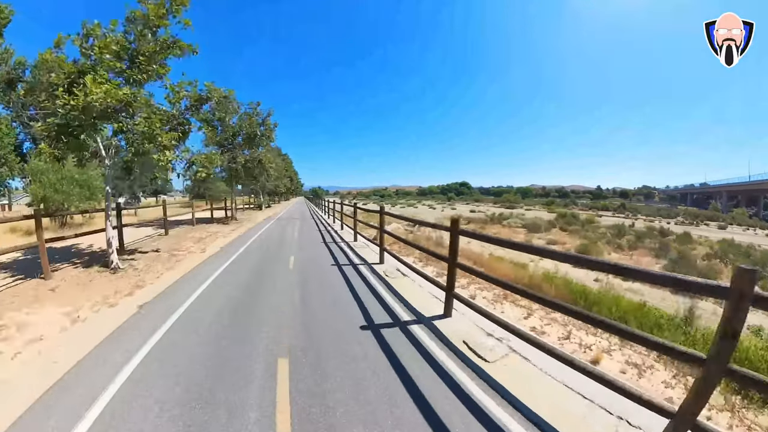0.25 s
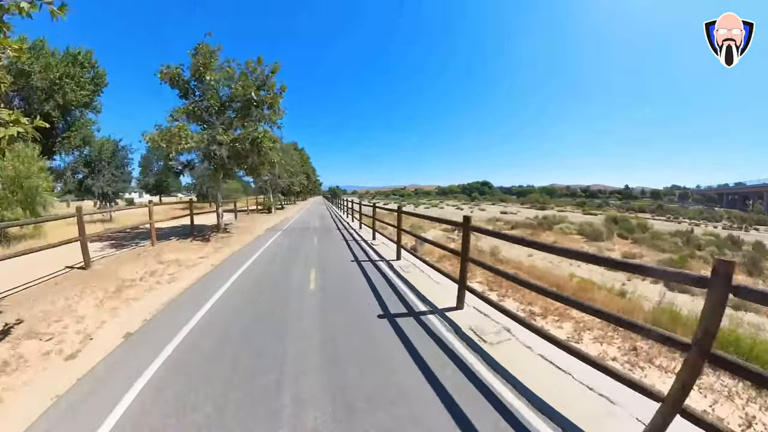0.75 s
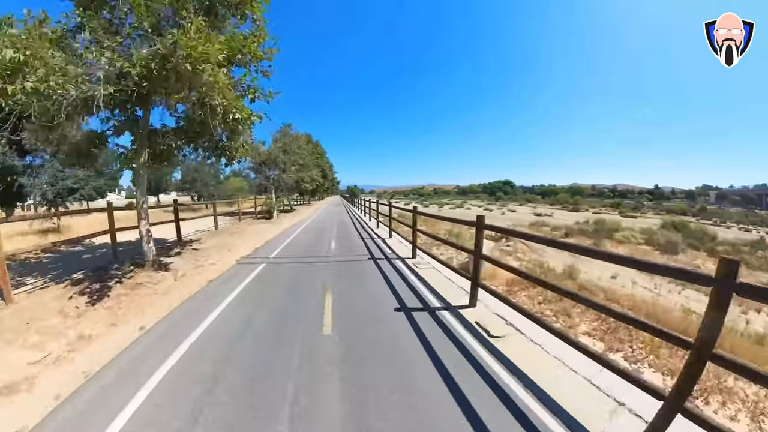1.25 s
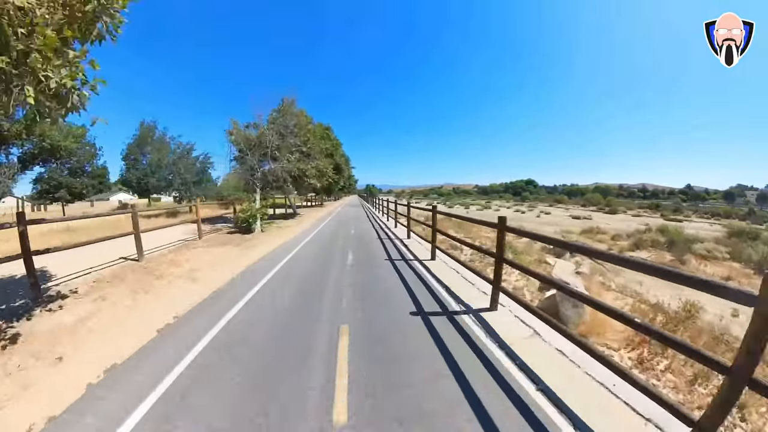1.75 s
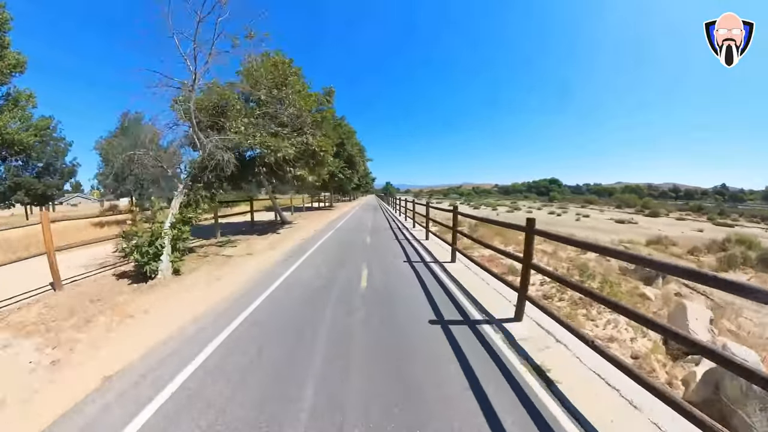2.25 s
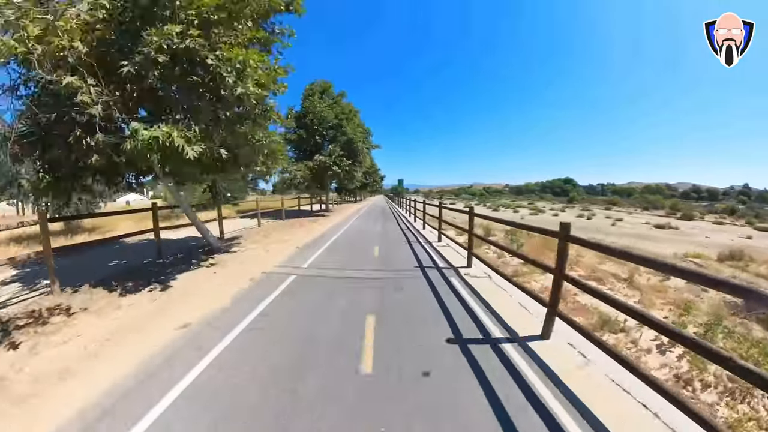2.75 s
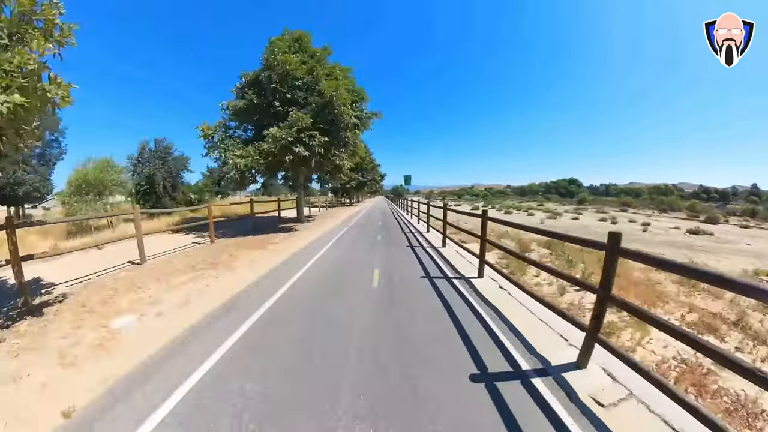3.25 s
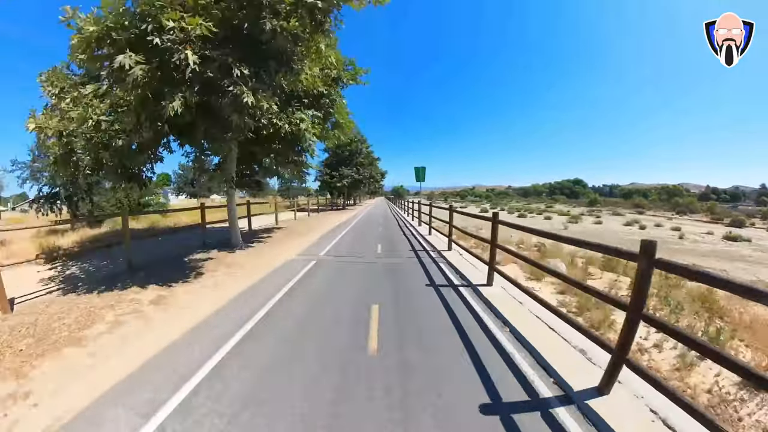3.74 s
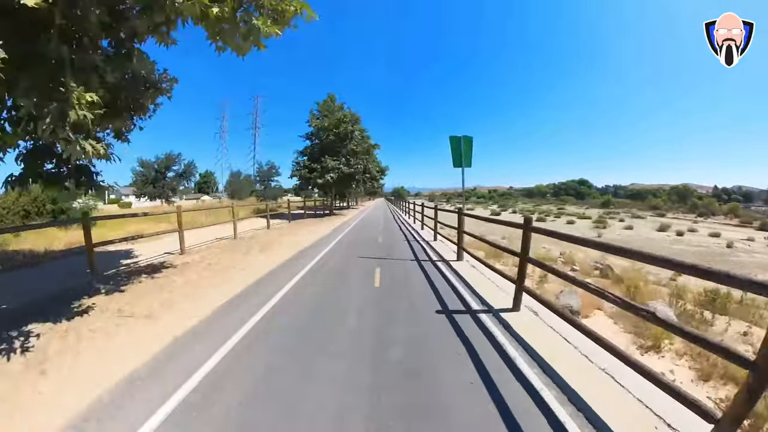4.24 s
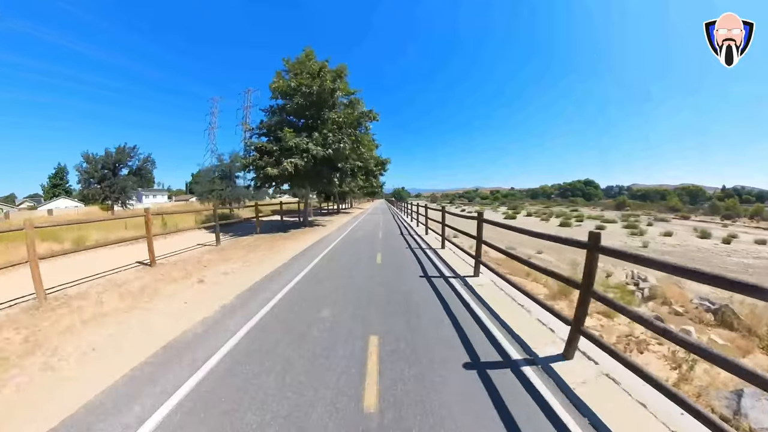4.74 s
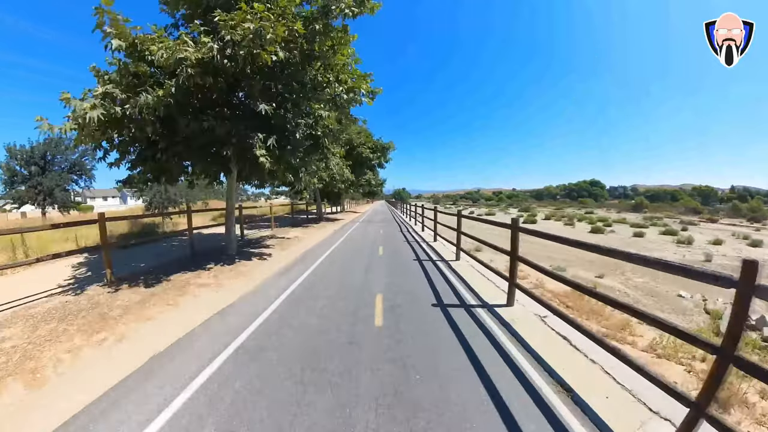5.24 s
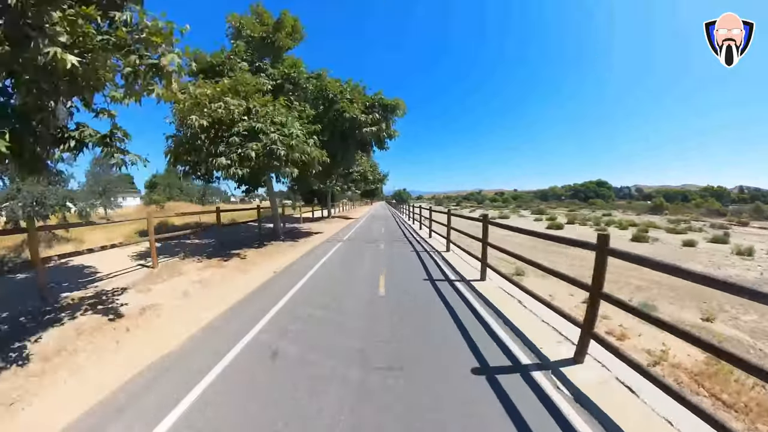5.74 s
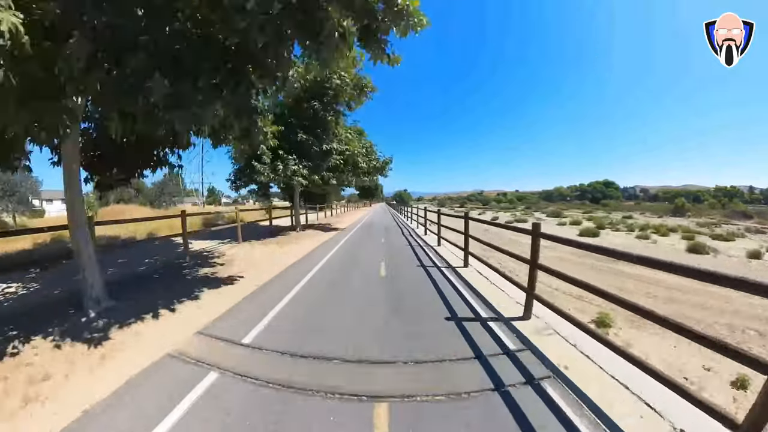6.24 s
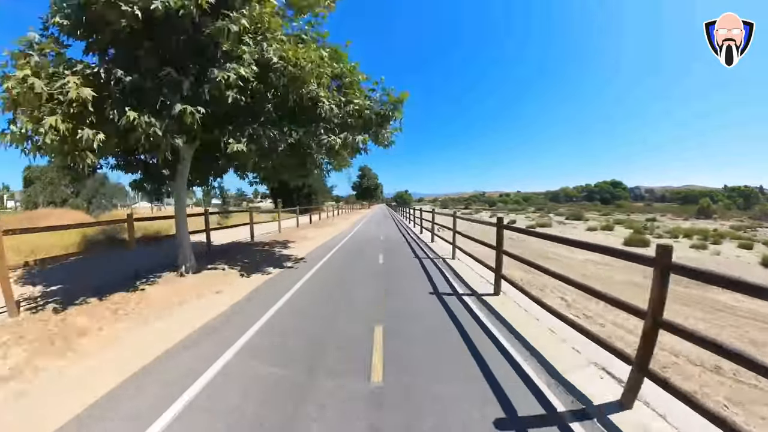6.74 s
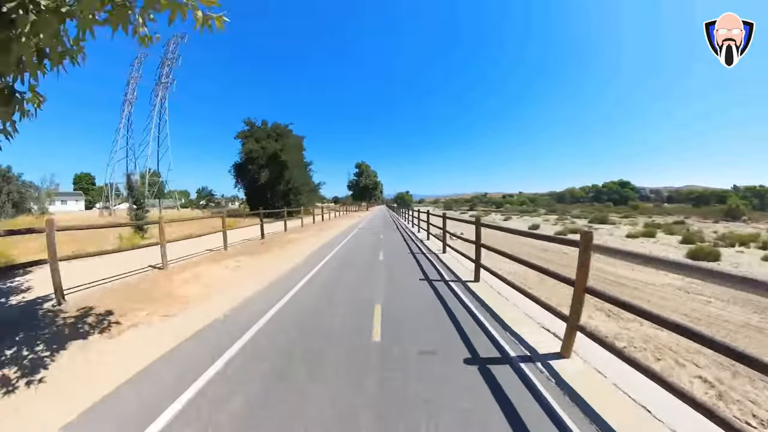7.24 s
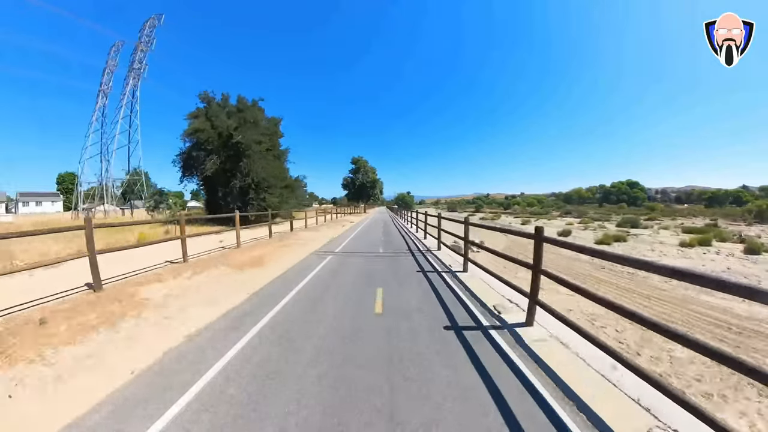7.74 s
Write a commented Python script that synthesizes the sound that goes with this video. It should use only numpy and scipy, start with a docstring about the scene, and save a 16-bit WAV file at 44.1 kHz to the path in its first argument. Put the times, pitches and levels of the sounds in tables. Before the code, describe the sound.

Heard from a rider-mounted microphone in open air, an electric scooter gradually accelerates. A low motor hum with overtones climbs smoothly while bassy wind buffets and drones around the microphone. Tyres hiss faintly and a brake disc brushes lightly once per turn. Dull stem knocks come irregularly; paving joints bring thumps with small metallic clinks at about two, four and a half, and six and a half seconds, the last hardest.

```python
"""An electric scooter accelerates along a paved path, heard from a camera on the rider.
Two hub motors hum and whine upwards as multiples of wheel speed, while noise-made wind buffets the microphone.
Tyres hiss, a brake disc brushes its pad once a turn, the stem knocks, wheels thump into joints in the paving,
loose steel clinks over them and grit spits from a tyre: rings of decaying modes and short bursts of noise.
Now and then a big eddy hits the microphone and the camera's limiter ducks everything for a moment."""
import sys
import numpy as np
from scipy import signal
from scipy.fft import rfft, irfft, next_fast_len
from scipy.io import wavfile
from scipy.ndimage import uniform_filter1d, minimum_filter1d, map_coordinates

SR = 44100
rng = np.random.default_rng(int(sys.argv[2]) if len(sys.argv) > 2 else 0)


def bounce(signal):
    """Save signal as a 16-bit WAV file at the path given by the first command-line argument."""
    frames = np.transpose(np.atleast_2d(signal))
    limited = np.clip(frames, -1, 1)
    pcm = np.round(limited * 32767).astype(np.int16)
    wavfile.write(sys.argv[1], SR, pcm)


N = 352359
T = np.arange(N) / SR  # time of each sample, s


def amp(db):
    """Decibels to gain."""
    return 10 ** (np.asarray(db) / 20)


def unit(x):
    """Scale to rms 1."""
    return x / np.sqrt(np.mean(x ** 2) + 1e-20)


def curve(rows):
    """One value per sample, on straight lines between rows of (time in s, value)."""
    seconds, values = np.transpose(rows)
    return np.interp(T, seconds, values)


def wobble(rate):
    """A smooth random curve, rate knots a second."""
    knots = rng.standard_normal(int(N * rate / SR) + 4)
    return map_coordinates(knots, [T * rate])


def swell(middle, length):
    """A smooth rise from 0 to 1 and back, centred on a time; both in seconds."""
    return np.cos(np.pi * np.clip((T - middle) / length, -.5, .5)) ** 2


def filtered(x, response):
    """Shape the spectrum of x by a response of frequency."""
    size = next_fast_len(N + SR // 4)
    hz = np.fft.rfftfreq(size, 1 / SR)
    return irfft(rfft(x, size) * response(hz), size)[:N]


def noise(spectrum, flutter_db, flutter_rate):
    """Turbulent noise of rms 1: it comes in quick random bursts, then takes its colour."""
    hz, db = np.transpose(spectrum)
    bursts = rng.standard_normal(N) * amp(flutter_db * wobble(flutter_rate))
    colour = lambda f: amp(np.interp(np.log(f + 1), np.log(hz), db, right=-120))
    return unit(filtered(bursts, colour))


def add(track, start, sound):
    """Mix a sound into the track at a time in seconds."""
    part = track[max(0, round(start * SR)):][:len(sound)]
    part += sound[:len(part)]


# The first wheel, gathering pace under the rider. Each row: time in seconds, speed in turns a second.
WHEEL_SPEED = [(0, 13.93), (1.1, 14.2), (1.8, 15.05), (2.3, 15.4), (4, 17.35), (4.3, 17.5), (5.3, 18.5),
               (8, 20.45)]


def wheel_speed():
    """Turns a second of the first wheel, which sets the motors' pitch and the rolling level."""
    return curve(WHEEL_SPEED)


SLIP = .986  # the second wheel's speed over the first's


def wheel_turns():
    """Turns made by each wheel; the second rolls a little slower."""
    turns = np.cumsum(wheel_speed()) / SR
    return turns, turns * SLIP


def by_speed(cruise_db, per_doubling_db):
    """Level in dB of a noise that grows with wheel speed, from its level at a middling speed."""
    cruise = 17  # turns a second
    return cruise_db + per_doubling_db * np.log2(wheel_speed() / cruise)


# Resonances that a motor line swells in as it climbs through them.
# Each row: centre in Hz, width in Hz, line level in dB.
BODY_RESONANCES = [(139.3, 6, -11.8), (151.3, 15, -16.5), (161.1, 7.4, -18.5), (174, 3.4, -21.5),
                   (182.66, 7, -15.5), (200.3, 6.8, -15), (306.6, 6.8, -25.5), (324.3, 12, -24),
                   (340, 8.5, -21), (363.5, 10, -22.3), (378.6, 11, -24.3), (404, 14, -29), (810, 46, -46),
                   (873, 57, -42), (955, 31, -43.5)]


def body_db(order):
    """Level in dB of a motor line as its pitch climbs through the resonances."""
    hz = order * wheel_speed()
    power = 0
    for centre, width, db in BODY_RESONANCES:
        detuning = 2 * (hz - centre) / width
        power = power + amp(db) ** 2 / (1 + detuning ** 2) ** 1.325
    return 10 * np.log10(power)


def tone(turns, order, db, waver_db, jitter, shake_rate=15):
    """A motor line at a multiple of the wheel speed, its phase (jitter in radians) shaken by the road."""
    phase = 2 * np.pi * order * turns + jitter * wobble(shake_rate)
    return np.sqrt(2) * amp(db + waver_db * wobble(16)) * np.sin(phase)


# The second motor's slot tone, which sinks away early. Each row: time in seconds, level in dB.
SLOT_TONE = [(0, -31.5), (0.85, -27.5), (1.27, -21.5), (1.5, -55)]


def motors(first, second):
    """Torque ripple hums ten times a turn, with harmonics; the other motor adds its slot tone and whine."""
    hum = tone(first, order=10, db=body_db(10), waver_db=1.2, jitter=.11)
    hum += tone(first, order=20, db=body_db(20), waver_db=1.4, jitter=.15)
    hum += tone(first, order=30, db=body_db(20) - 19.5, waver_db=3.0, jitter=1.0)
    slots = tone(second, order=27, db=curve(SLOT_TONE), waver_db=1.0, jitter=0.45)
    whine = tone(second, order=56, db=body_db(56 * SLIP), waver_db=2.2, jitter=.55, shake_rate=20)
    return hum + slots + whine


# Turbulence right at the microphone, before the big eddies. Each row: time in seconds, level in dB.
GUSTS = [(0, -17.5), (0.4, -19.5), (0.9, -19), (1.15, -15.5), (2.6, -15), (3.7, -16), (4.2, -15),
         (4.9, -17), (5.6, -15), (6.3, -14.5), (8, -16)]
# Air rushing round the camera. Each row: time in seconds, level in dB.
RUSH = [(0, -36), (0.2, -38), (0.4, -39.5), (0.65, -38), (0.95, -37.5), (1.3, -33), (1.6, -37), (1.85, -30),
        (2.15, -37), (2.42, -33.5), (2.7, -33.5), (3.08, -34.5), (3.3, -33), (3.52, -32.5), (3.7, -31.5),
        (3.88, -34.5), (4.3, -31.5), (4.6, -36), (4.92, -30), (5.1, -33.5), (5.5, -33), (5.88, -34),
        (6.33, -32.5), (6.5, -33), (7.2, -33.5), (8, -33)]
# Big eddies striking the microphone. Each row: middle in seconds, length in seconds, extra buffet in dB,
# extra drone in dB, slow pressure push in dB.
EDDIES = [(1.965, 0.35, 7.5, 7, -9.5), (2.096, 0.27, 4, 4.5, -8.5), (2.437, 0.27, 0, 3, -22),
          (3.412, 0.25, 8, 3.5, -9), (4.405, 0.27, 5.5, 3, -24), (4.51, 0.22, 7.5, 4.5, -6.5),
          (6.6, 0.21, 7, 4.5, -10), (7.26, 0.061, 2, -5, -25.5)]
# Colours of the wind at the microphone and round the camera. Each row: frequency in Hz, relative level in dB.
BUFFET_SPECTRUM = [(10, -56), (22, -31), (30, -11.5), (40, -1), (55, 4), (75, 0.3), (100, -1), (125, -2.5),
                   (170, -10), (400, -63)]
DRONE_SPECTRUM = [(70, -28.5), (115, -19), (140, 5), (165, -7), (203, -4), (230, -14), (290, -15.5),
                  (400, -17.5), (500, -25), (700, -38.5), (1500, -74.5)]
RUSH_SPECTRUM = [(300, -16.5), (550, 2), (680, 2), (820, 2.5), (1180, 4), (1280, -2), (1420, -11),
                 (2100, -15.5), (2700, -23), (3500, -34), (6000, -68)]


def wind():
    """Turbulence buffets the microphone and surges in big eddies; smaller whirls drone and rush round it."""
    buffet_db = curve(GUSTS)
    drone_db = by_speed(cruise_db=-16.7, per_doubling_db=2)
    push = np.zeros(N)
    for middle, length, more_buffet_db, more_drone_db, push_db in EDDIES:
        eddy = swell(middle, length)
        push += amp(push_db) * eddy
        buffet_db = buffet_db + more_buffet_db * eddy
        drone_db = drone_db + more_drone_db * eddy
    buffet = amp(buffet_db) * noise(BUFFET_SPECTRUM, flutter_db=1.4, flutter_rate=9)
    drone = amp(drone_db) * noise(DRONE_SPECTRUM, flutter_db=2.6, flutter_rate=60)
    rush = amp(curve(RUSH)) * noise(RUSH_SPECTRUM, flutter_db=1.0, flutter_rate=170)
    return push + buffet + drone + rush


# Stretches of coarser asphalt under the wheels. Each row: middle in seconds, length in seconds, extra hiss in dB.
COARSE_ASPHALT = [(1.35, 1.2, 3.7), (2.9, 0.92, 2.5), (3.703, 0.84, 5), (4.202, 0.64, 3), (4.94, 0.59, 2),
                  (5.553, 0.9, 1.5), (6.164, 0.99, 4.5), (6.286, 0.17, 4), (7.88, 0.21, 2)]
# Ripples in the paving that shake the deck. Each row: middle in seconds, length in seconds, extra level in dB.
RIPPLES = [(1.852, 0.27, 0.5), (4.376, 0.5, 2), (4.927, 0.11, 2.5), (5.281, 0.14, 6.5), (6.15, 0.15, 8.5),
           (7.543, 0.3, 3.5)]
# Colours of the deck underfoot and of the tyres. Each row: frequency in Hz, relative level in dB.
DECK_SPECTRUM = [(220, -42), (300, -11), (340, -2.5), (378, 1.5), (420, -17.5), (520, -26), (900, -62)]
TYRE_SPECTRUM = [(1200, -14.5), (2400, 6), (3300, 0), (3950, 2), (4700, -6), (7000, -9.5), (7800, -17.5),
                 (9500, -11.5), (10500, -13), (11200, -30), (12000, -34)]


def rolling(turns):
    """Asphalt shakes the deck and hisses under the tyres; an uneven tread throbs once a turn."""
    coarse_db = sum(db * swell(middle, length) for middle, length, db in COARSE_ASPHALT)
    ripple_db = sum(db * swell(middle, length) for middle, length, db in RIPPLES)
    tread = np.cos(2 * np.pi * turns)
    deck_db = by_speed(cruise_db=-28, per_doubling_db=15) + ripple_db + 2 * tread
    deck_db += 0.56 * coarse_db  # coarse asphalt shakes the deck less than it lifts the hiss
    hiss_db = by_speed(cruise_db=-57, per_doubling_db=11.5) + coarse_db + 0.4 * tread
    hiss_db += 1.2 * wobble(13)
    deck = amp(deck_db) * noise(DECK_SPECTRUM, flutter_db=0.9, flutter_rate=40)
    hiss = amp(hiss_db) * noise(TYRE_SPECTRUM, flutter_db=1.5, flutter_rate=140)
    return deck + hiss


# How hard the brake disc brushes, down at the wheel. Each row: time in seconds, level in dB.
DISC_RUB = [(0, -68.5), (0.12, -63), (0.45, -73), (0.67, -64), (0.85, -70), (1.25, -62.5), (1.55, -62),
            (1.85, -74), (2.25, -77.5), (2.87, -69.5), (3.25, -77), (3.55, -64.5), (3.75, -71.5),
            (3.95, -62.5), (4.2, -80), (4.9, -72), (5.6, -79), (6.15, -61.5), (6.7, -73), (8, -75)]
# Modes of the brake disc. Each row: frequency in Hz, relative level in dB, 60 dB decay in seconds.
DISC_MODES = [(5700, -5, 0.09), (6900, -2.5, 0.13), (7100, -1, 0.13), (7660, -11.5, 0.02), (8600, -2, 0.05),
              (9160, 4.5, 0.16), (9410, 3, 0.16), (10500, -8.5, 0.015), (11500, -8.5, 0.029)]


def brake_disc(turns):
    """A slightly warped disc scrapes past its pad once a turn, never twice alike; friction makes it ring."""
    touch_turn, touch_rise = .1, .08  # where the touch starts and how long it swells, turns
    since = (turns - touch_turn + 0.02 * wobble(15)) % 1 / touch_rise
    touch = since * np.exp(1 - since) * amp(1.3 * wobble(15))
    drag = amp(by_speed(cruise_db=-13, per_doubling_db=26))  # between touches, relative to a touch
    friction = (touch + drag) * rng.standard_normal(N)

    def steel(f):
        """Summed resonances of the disc; a longer decay makes a narrower peak."""
        response = 0
        for hz, db, t60 in DISC_MODES:
            width = np.log(1000) / (np.pi * t60)
            response = response + amp(db) * 1j * f * width / (hz ** 2 - f ** 2 + 1j * f * width)
        return response

    return amp(curve(DISC_RUB)) * unit(filtered(friction, steel))


# What the stem and the camera mount ring with.
# Each row: frequency in Hz at the usual pitch, relative level in dB, 60 dB decay in seconds.
STEM_MODES = [(140, 1, .04), (270, -2, .03), (440, -3, .016), (820, -8, .008), (1080, -1.3, .012),
              (1450, -10.5, .010), (1900, -15, .007)]


def knock(pitch=1, top_hz=1900):
    """A dull blow: a click of a few cycles over a short low thump, softened by the camera mount."""
    t = T[:SR // 16]
    body = np.zeros(len(t))
    for hz, db, t60 in STEM_MODES:
        decay = amp(db + rng.normal() - 60 * t / t60)
        mode_hz = hz * pitch * np.exp(.04 * rng.normal())
        body += decay * np.sin(2 * np.pi * mode_hz * t)
    mount = signal.butter(4, top_hz, fs=SR, output="sos")
    return signal.sosfilt(mount, body)


# Play in the steering stem knocking through to the camera.
# Each row: start in seconds, strength in dB, pitch over the usual, treble reach in Hz.
STEM_KNOCKS = [(0.5065, -18, 1.05, 1800), (0.678, -19, .8, 1400), (0.8205, -21.5, .9, 1600),
               (1.0822, -15.5, 1, 1700), (1.3667, -13, 1, 2100), (2.044, -18, .65, 1000),
               (2.4367, -13, .95, 2200), (3.0074, -18, 1.05, 2000), (3.207, -22.5, 1, 1500),
               (3.2811, -19, 1.15, 2000), (3.4458, -16.5, 1.1, 1800), (4.0198, -17.5, .85, 1500),
               (4.351, -19, .8, 1400), (4.3921, -18, .95, 2000), (4.4817, -12, 1, 2100),
               (4.4848, -14, .85, 1400), (4.5186, -16, .85, 1600), (4.5567, -14, 1, 1800),
               (4.850, -18, .95, 1600), (4.8963, -19, .95, 1600), (5.0617, -15, 1, 1800),
               (5.903, -19, .8, 1400), (6.134, -17, .8, 1400), (6.338, -18, 1, 1600),
               (6.5857, -15.5, 1.25, 2400), (6.5997, -15.5, 1, 1700), (6.6322, -13, 1.05, 2300),
               (6.6682, -10, .8, 4000), (6.891, -15.5, 1, 1600)]


def knocks():
    """The stem's play knocks hard over bumps and chatters faintly at random times."""
    out = np.zeros(N)
    for start, db, pitch, top_hz in STEM_KNOCKS:
        add(out, start, amp(db) * knock(pitch, top_hz))
    for when, size in rng.random((60, 2)):
        add(out, when * N / SR, amp(-33.5 + 1.9 * size) * knock())
    return out


def ring(modes, scatter_db, blur):
    """One blow on a steel part: every mode starts at a new strength, and friction blurs its phase."""
    t = T[:SR // 4]
    hz, db, t60 = np.transpose(modes)[:, :, None]
    steps = rng.standard_normal((len(modes), len(t)))
    drift = np.cumsum(steps, axis=1) * blur / np.sqrt(SR)
    phase = 2 * np.pi * (hz * t + rng.random(hz.shape)) + drift
    decay = amp(db + scatter_db * rng.standard_normal(hz.shape) - 60 * t / t60)
    return np.sum(decay * np.sin(phase), axis=0)


# Loose steel on the scooter jolted by the joints. Each row: start in seconds, strength in dB.
STEEL_CLINKS = [(1.374, -52), (2.0138, -45.5), (2.0625, -51), (2.1206, -57), (4.4138, -45.5), (4.4602, -55),
                (4.4942, -46), (6.6107, -40), (6.7017, -48.5)]
# Modes of the loose steel. Each row: frequency in Hz, relative level in dB, 60 dB decay in seconds.
STEEL_MODES = [(7300, -0.5, 0.034), (7650, -7, .03), (8710, -6.5, .03), (9400, -4.5, .025),
               (9990, -12.5, .35), (10500, -3, 0.03), (11100, -13, .025)]


def clinks():
    """Loose steel rings over the joints, each blow building up over a brief contact."""
    out, t = np.zeros(N), T[:SR // 4]
    contact = 1 - np.exp(-t / 0.00093)
    for start, db in STEEL_CLINKS:
        add(out, start, amp(db) * contact * ring(STEEL_MODES, scatter_db=1.5, blur=9))
    return out


# Wheels dropping into joints of the paving. Each row: start in seconds, strength in dB.
WHEEL_DROPS = [(2.045, -9), (2.056, -6), (4.4815, -4), (6.564, -6), (6.5855, -2), (6.6275, -6), (6.668, 0)]
# Modes of the deck and frame. Each row: frequency in Hz, relative level in dB, 60 dB decay in seconds.
FRAME_MODES = [(138, -2, 0.09), (255, -2, 0.045), (467, -5, 0.016)]


def jolts():
    """Each hard drop of a wheel thumps through the frame, its onset eased by the tyre."""
    out, t = np.zeros(N), T[:SR // 8]
    tyre_give = 1 - np.exp(-t / 0.00081)
    for start, db in WHEEL_DROPS:
        thump = np.zeros(len(t))
        for hz, level, t60 in FRAME_MODES:
            decay = amp(level + rng.normal() - 60 * t / t60)
            thump += decay * np.sin(2 * np.pi * hz * t)
        add(out, start, amp(db) * tyre_give * thump)
    return out


# Grit flicked by a tyre. Each row: start in seconds, strength in dB.
GRIT_SPITS = [(3.683, -36.5), (4.35, -41), (5.965, -40.5)]


def grit():
    """Grit spits from under a tyre: quickly dying noise in a band of the treble."""
    out, t = np.zeros(N), T[:SR // 4]
    spit_band = signal.butter(2, [3500, 7500], "bandpass", fs=SR, output="sos")
    for start, db in GRIT_SPITS:
        spit = signal.sosfilt(spit_band, rng.standard_normal(len(t)))
        add(out, start, amp(db - 60 * t / 0.033) * spit)
    return out


def scene():
    """Everything rides along with the microphone, in open air."""
    first, second = wheel_turns()
    scooter = motors(first, second) + rolling(first) + brake_disc(second)
    scooter += knocks() + clinks() + jolts() + grit()
    return (scooter + wind())[None]


def record(dry):
    """The camera's limiter ducks just before each overload, holds and recovers; then its band is limited."""
    ceiling_db, peak_ceiling_db = -4.5, 0.1  # rms and peak thresholds
    hold_s, release_db_per_s = 0.074, 27
    low_cut_hz, top_hz = 23, 12200
    sound = dry[0]
    level_db = 10 * np.log10(np.abs(uniform_filter1d(sound ** 2, size=400)) + 1e-12)
    peak_db = 20 * np.log10(np.abs(sound) + 1e-9)
    needed_db = np.minimum(0, np.minimum(ceiling_db - level_db, peak_ceiling_db - peak_db))
    half = int(hold_s * SR / 2)
    held_db = minimum_filter1d(needed_db, size=2 * half + 1, origin=half)
    # the gain may drop at once but climbs back no faster than the release
    recovery_db = release_db_per_s * T
    gain_db = np.minimum.accumulate(held_db - recovery_db) + recovery_db
    # a short look ahead, smoothed so that the ducking does not click
    gain = amp(uniform_filter1d(minimum_filter1d(gain_db, size=300), size=300))
    # the low cut removes the slow pressure, and nothing passes above the top
    band = lambda hz: (hz < top_hz) * hz ** 6 / (hz ** 6 + low_cut_hz ** 6)
    return filtered(sound * gain, band)[None]


dry = scene()
out = record(dry)
bounce(out)
```